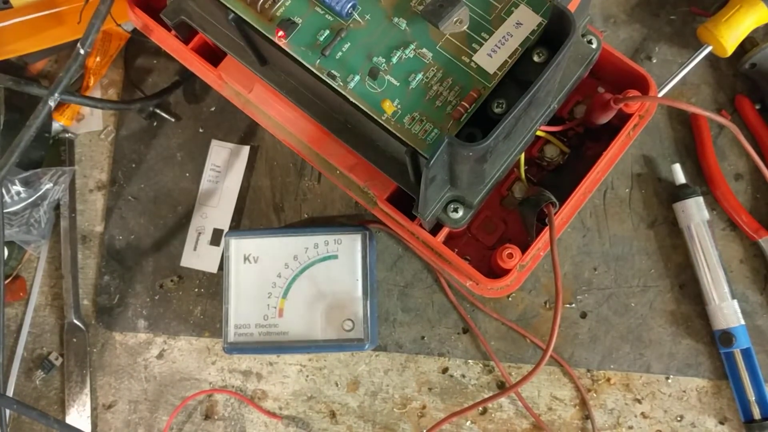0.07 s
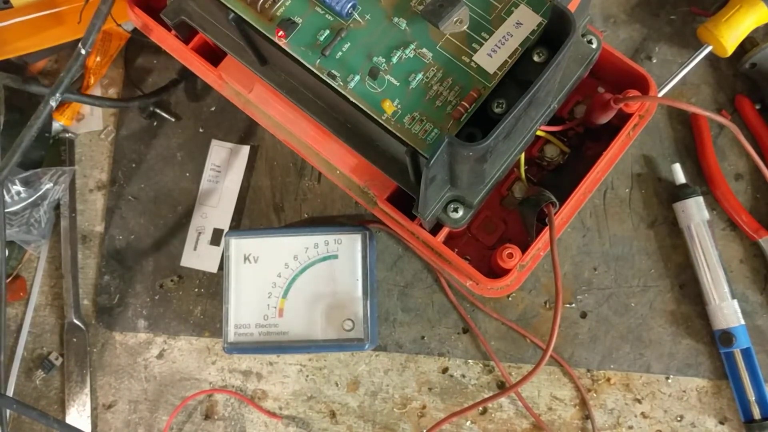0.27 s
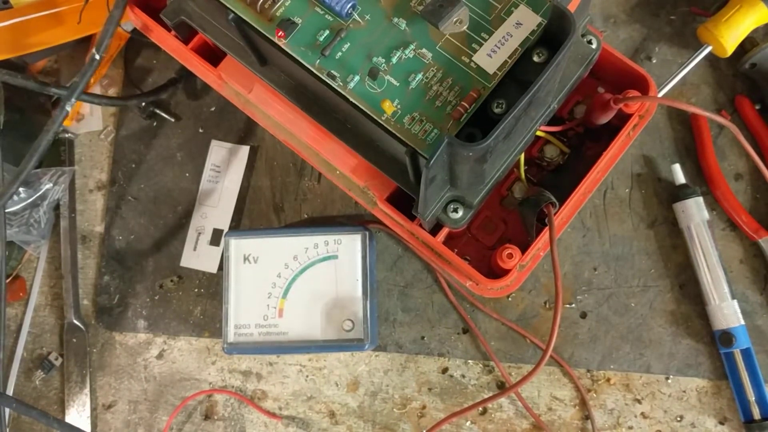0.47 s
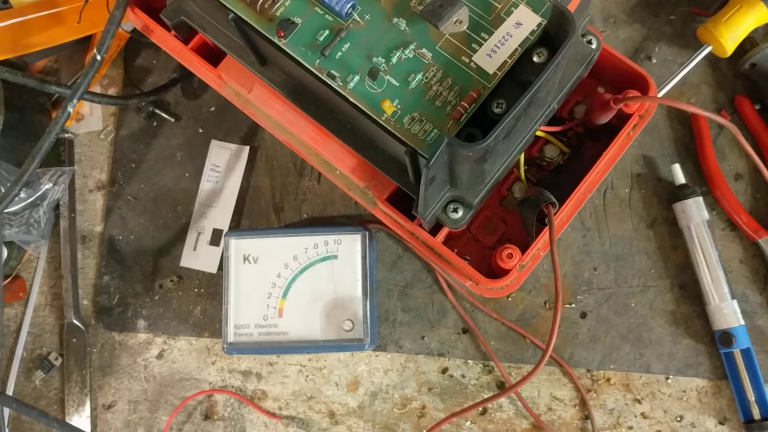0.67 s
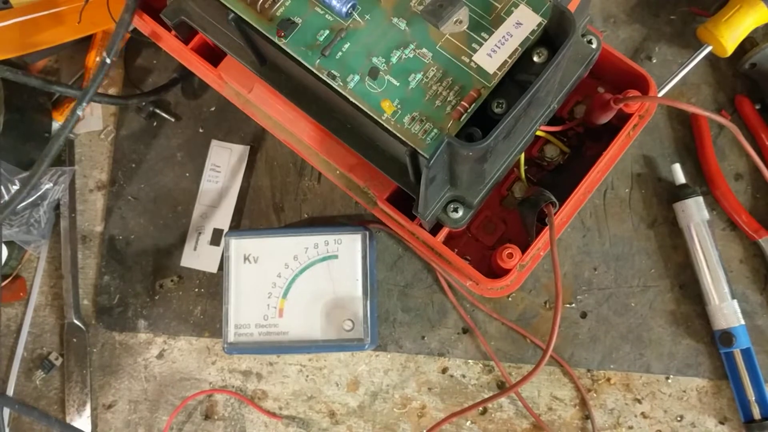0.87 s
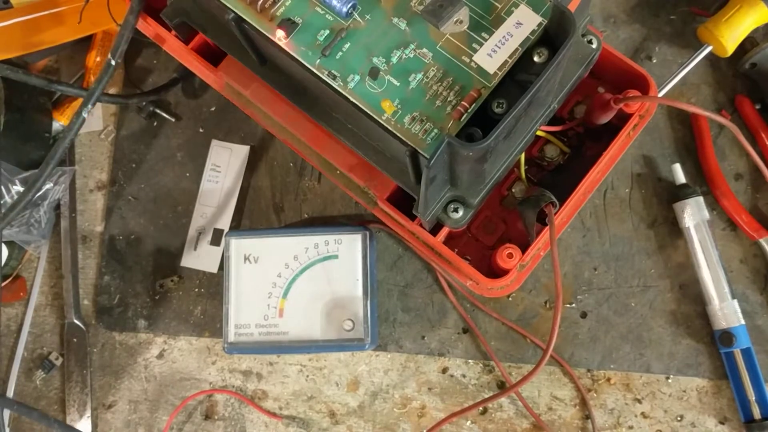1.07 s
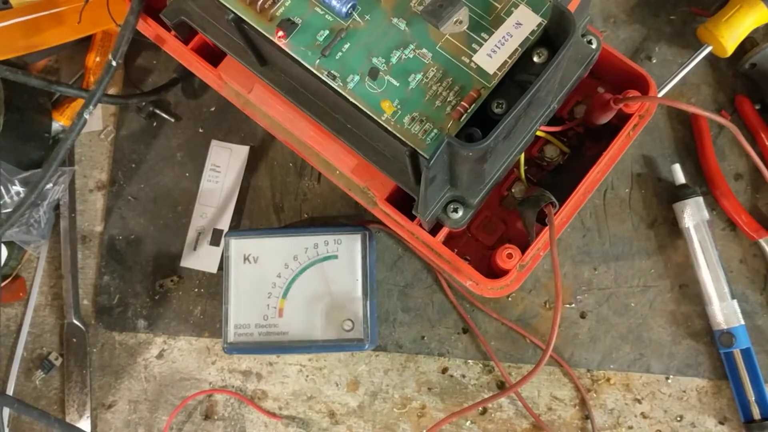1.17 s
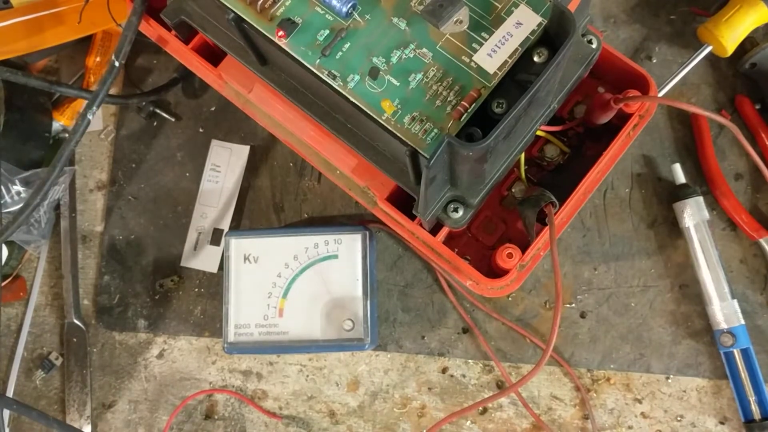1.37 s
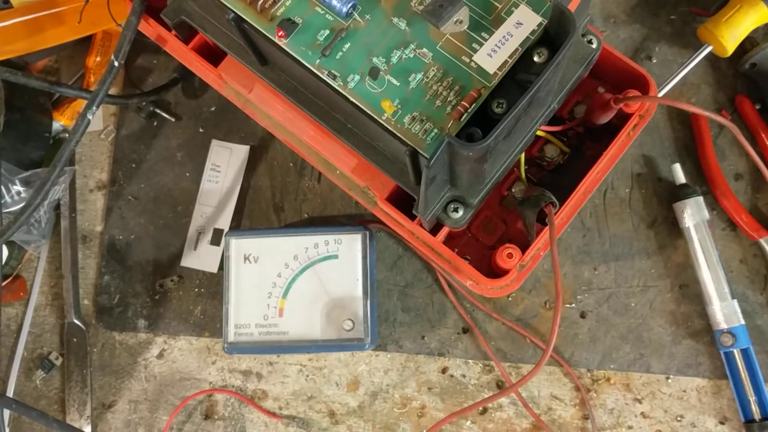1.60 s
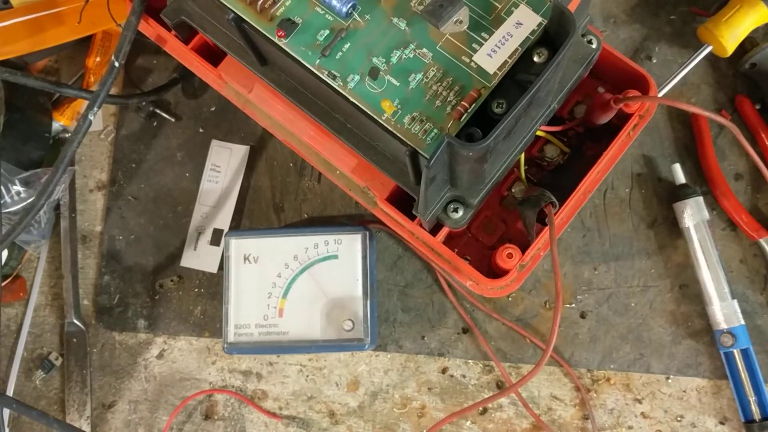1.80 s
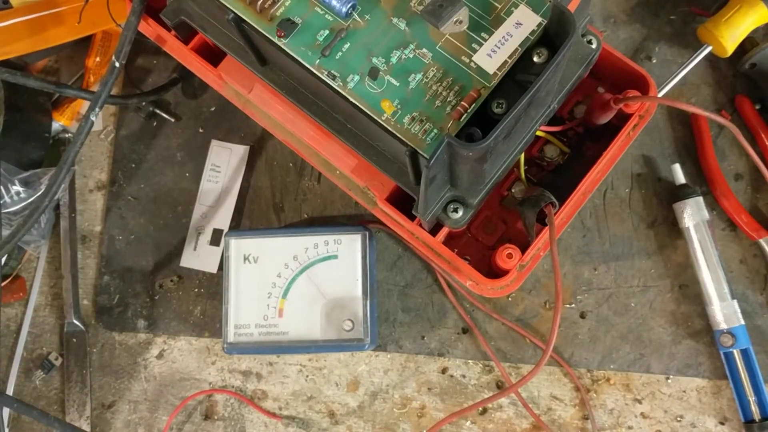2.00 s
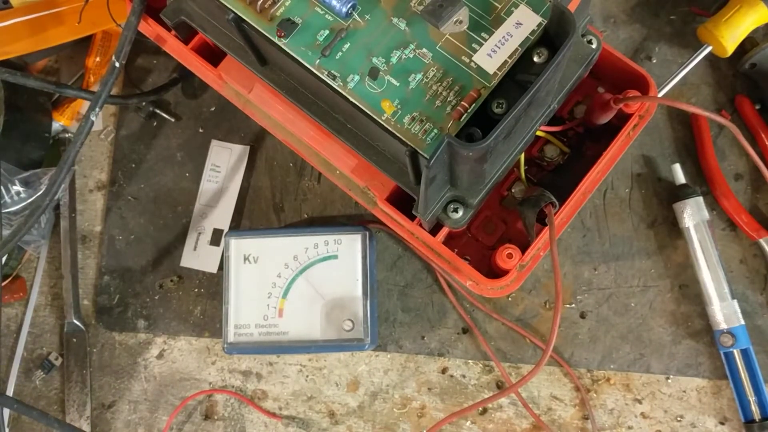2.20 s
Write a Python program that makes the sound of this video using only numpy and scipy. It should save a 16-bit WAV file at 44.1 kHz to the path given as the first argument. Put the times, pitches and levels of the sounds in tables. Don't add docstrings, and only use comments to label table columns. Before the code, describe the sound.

An electric fence charger gives one sharp snap with a brief hollow ring midway, in a small workshop; low handling bumps, creaks and tiny ticks surround it over faint mains hum, captured close by a handheld camera.

```python
import sys
import numpy as np
from scipy import signal
from scipy.fft import rfft, irfft
from scipy.io import wavfile
from scipy.ndimage import uniform_filter1d

SR = 44100
rng = np.random.default_rng(int(sys.argv[2]) if len(sys.argv) > 2 else 0)


def rack_gain(trim_db):
    fader = np.asarray(trim_db, float)
    return 10 ** (fader / 20)


def persist_wave(psi):
    counts = np.round(np.clip(psi, -1, 1) * 32767).astype(np.int16)
    wavfile.write(sys.argv[1], SR, np.atleast_2d(counts).T)


N = 99225


def evened(x):
    return x / np.sqrt(np.mean(x ** 2) + 1e-20)


def read(points, hz):
    f, value = np.transpose(points)
    return np.interp(np.log(hz + 1), np.log(f + 1), value)


def add(mix, s, sound):
    part = mix[round(s * SR):][:len(sound)]
    part += sound[:len(part)]


def coloured(points, size):
    gain = rack_gain(read(points, np.fft.rfftfreq(size, 1 / SR)))
    return evened(irfft(rfft(rng.standard_normal(size)) * gain, size))


def resonate(x, hz, width_hz):
    turn = np.exp(2j * np.pi * np.cumsum(hz * np.ones(len(x))) / SR)
    r = np.exp(-np.pi * width_hz / SR)
    return 2 * (turn * signal.lfilter([1 - r], [1, -r], x / turn)).real


def resonate_twice(x, hz, first_width_hz, second_width_hz):
    return resonate(resonate(x, hz, first_width_hz), hz, second_width_hz)


def wander(s):
    k = max(int(s * SR), 1)
    return evened(uniform_filter1d(uniform_filter1d(rng.standard_normal(N), k), k))


def case_ring(t):
    # f/Hz, level/dB, t60/s
    modes = [(629, -4, 0.042), (1021, 1, 0.03), (1227, -8.5, 0.055), (1463, -3, 0.032), (1785, -13, 0.035),
             (2040, 5, 0.027), (2565, 2, 0.024), (2750, -6, 0.01), (3095, -2, 0.025), (3316, -3.5, 0.04),
             (4140, -10, 0.035), (5030, -9, 0.03), (5374, -8, 0.029), (7570, -16, 0.027)]
    rise_s, slow_hz = 0.0028, 886
    rattle, rattle_s = 0.35, 0.005
    wobble = uniform_filter1d(rng.standard_normal((len(modes), len(t))), int(rattle_s * SR), axis=1)
    loose = 1 + rattle * evened(wobble)
    out = np.zeros(len(t))
    for (hz, db, t60), phase, rough in zip(modes, rng.random(len(modes)), loose):
        rise = np.minimum(t / rise_s / (1 + (slow_hz / hz) ** 2), 1) ** 2
        out += rise * rough * rack_gain(db - 60 * t / t60) * np.sin(2 * np.pi * (hz * t + phase))
    return out


def discharge_crack(t):
    # f/Hz, level/dB
    spectrum = [(300, -62), (550, -16.5), (2600, -3.5), (5250, -20), (5900, -22), (13500, -28.5),
                (15200, -22), (16500, -35)]
    split_hz = 6050
    spark_db, spark_t60_s, spark_rise_s = -23, 0.018, 0.0027
    crack_db, crack_t60_s, crack_rise_s = -31, 0.035, 0.00096
    noise = coloured(spectrum, len(t))
    high = signal.sosfilt(signal.butter(N=4, Wn=split_hz, btype="high", fs=SR, output="sos"), noise)
    low = signal.sosfilt(signal.butter(N=4, Wn=split_hz, fs=SR, output="sos"), noise)
    spark = high * rack_gain(spark_db - 60 * t / spark_t60_s) * np.minimum(t / spark_rise_s, 1)
    crack = low * rack_gain(crack_db - 60 * t / crack_t60_s) * np.minimum(t / crack_rise_s, 1)
    return spark + crack


def room_tail(t):
    # f/Hz, t60/s
    decay = [(450, 0.46), (1500, 0.27), (4000, 0.3), (8000, 0.3), (15000, 0.065)]
    # f/Hz, level/dB
    colour = [(250, -12), (450, -0.5), (1100, 2.5), (2300, 3), (3600, -7), (5500, -14), (8000, -24),
              (15000, -31)]
    level_db, delay_s, rise_s = -51.5, 0.004, 0.0017
    hz, ft, z = signal.stft(rng.standard_normal(len(t)), SR, nperseg=256)
    gain_db = read(colour, hz)[:, None] - 60 * ft / read(decay, hz)[:, None]
    tail = signal.istft(z * rack_gain(gain_db), SR, nperseg=256)[1][:len(t)]
    tail = tail * np.clip((t - delay_s) / rise_s, 0, 1)
    return rack_gain(level_db) * tail / np.std(tail[:SR // 50])


def snap():
    # delay/s, level/dB
    echoes = [
        (.0043, -16.5),
        (.0081, -23),
        (0.0115, -16),
    ]
    snap_s, ring_db = 1.1177, -28.5
    t = np.arange(SR // 2) / SR
    direct = rack_gain(ring_db) * case_ring(t) + discharge_crack(t)
    out = np.zeros(N)
    for delay_s, db in echoes:
        add(out, snap_s + delay_s, rack_gain(db) * uniform_filter1d(direct, size=4))
    add(out, snap_s, direct + room_tail(t))
    return out


def bumps():
    # centre t/s, peak level/dB, f/Hz, length/cycles
    heavy = [(0.212, -27, 84.6, 1), (0.235, -35, 50, 1.14), (0.289, -38, 113, 3), (0.294, -34.5, 55.3, 2.4),
             (0.312, -26.5, 120, 1.14), (0.322, -29.5, 74, 3.3), (0.381, -34.5, 70.3, 2.6),
             (0.442, -34.5, 79, 0.27), (0.463, -33.5, 69, 1.4), (0.489, -39, 120, 2.8),
             (0.531, -47, 70.4, 1.2), (0.55, -30, 69.6, 2.1), (0.573, -29, 112.5, 2.4),
             (0.622, -41, 56.4, 0.48), (0.716, -37.5, 52, 3), (0.831, -37.5, 120, 2.1),
             (0.834, -33.5, 68.4, 2.64), (0.917, -40.5, 56.2, 7.1), (0.933, -25.5, 160, 1.32),
             (0.959, -27, 118, 1.3), (0.983, -37.5, 77, 0.8), (1.0, -33.5, 147, 1.35),
             (1.011, -25.0, 64.6, 1.83), (1.059, -36.5, 111.5, 1.9), (1.155, -36.5, 63.6, 2.55),
             (1.216, -32.5, 83.3, 0.99), (1.674, -38, 148.5, 3.3), (1.672, -34, 80, 3.54),
             (1.715, -45, 59.7, 5.2), (1.963, -34.5, 77.6, 1.22)]
    # centre t/s, peak level/dB, f/Hz, length/cycles
    light = [(0.297, -49.5, 224, 5.9), (0.312, -38, 203, 1.1), (0.336, -49, 220, 1.6),
             (0.347, -38.5, 191, 1.8), (0.451, -43.5, 187, 3.7), (0.475, -44, 186, 3.1),
             (0.501, -43, 214, 2.2), (0.534, -42, 240, 1.1), (0.544, -42.5, 194, 6.3),
             (0.556, -42.5, 262, 0.94), (0.564, -40, 245, 5.7), (0.922, -42, 246, 1.3),
             (0.926, -50, 441, 7.8), (0.93, -26.5, 248, 0.67), (0.94, -71, 194, 2.1),
             (0.957, -39.5, 203, 1.7), (1.006, -39, 196, 2.8), (1.289, -43, 61.3, 1.8),
             (1.479, -38, 106.4, 0.87), (1.666, -47.5, 209, 0.87), (1.677, -52.5, 193, 3.7),
             (1.983, -41.5, 110, 2.5), (2.099, -42.5, 55, 0.72), (1.961, -49, 227, 1.5),
             (1.667, -57.5, 314, 2.1), (1.485, -44.5, 59.6, 1.5), (2.24, -43.5, 65, 1.1),
             (0.584, -52.5, 327, 1.8), (0.985, -52.5, 338, 2.7), (0.701, -47, 105, 2.5)]
    # t/s, level/dB
    pressure = [(0, -42), (0.199, -73), (.3, -44), (.58, -40.5), (0.801, -53.5), (0.928, -38), (1.05, -45),
                (1.25, -55.5), (1.6, -54.5), (1.679, -41), (1.8, -61), (1.92, -60), (1.98, -53.5),
                (2.25, -54.5)]
    # f/Hz, level/dB
    rumble_spectrum = [(20, -57), (40, 3), (62, 6.5), (110, -5), (200, -16.5), (320, -31), (600, -33.5),
                       (1200, -76)]
    lump_db, lump_s = 2.5, 0.012
    rise_share, pitch_sag = 0.62, 0.087
    rumble = evened(coloured(rumble_spectrum, N) * rack_gain(lump_db * wander(lump_s)))
    out = rack_gain(np.interp(np.arange(N) / SR, *np.transpose(pressure))) * rumble
    for s, db, hz, cycles in [*heavy, *light]:
        u = np.arange(-2, 3, hz / cycles / SR)
        shape = np.exp(-2 * np.where(u < 0, u / rise_share, u) ** 2)
        turns = cycles * (u - pitch_sag * u * u) + rng.random()
        add(out, s - 2 * cycles / hz, rack_gain(db) * shape * np.cos(2 * np.pi * turns))
    return out


def creaks():
    # start t/s, length/s, level/dB, centre f/Hz, slip rate/Hz, width/centre
    rubs = [(0.21, 0.23, -86, 6481, 550, 0.56), (0.291, 0.07, -71.5, 2480, 1140, 1),
            (0.296, 0.076, -79.5, 7407, 1100, 0.44), (.328, 0.0099, -65.5, 1490, 660, 0.28),
            (0.483, .013, -63.5, 970, 990, 0.5), (0.489, 0.033, -60, 430, 880, 0.38),
            (.92, 0.017, -65.5, 630, 390, 0.22), (0.673, 0.058, -74, 235.4, 320, 0.38),
            (0.975, 0.049, -63, 310, 205, 0.22), (1.254, 0.15, -76, 3670, 1600, 0.84),
            (1.382, 0.019, -56.5, 437, 1040, 0.27), (1.375, 0.018, -61.5, 805, 1000, 0.068),
            (1.374, 0.024, -64.5, 1100, 1270, 0.11), (1.401, 0.068, -70.5, 1290, 520, 0.93),
            (1.42, 0.18, -82, 6944, 1000, 0.41), (1.679, 0.035, -67.5, 2380, 900, 0.97),
            (1.71, 0.032, -70, 1380, 1000, 0.35), (1.908, 0.0097, -66, 1620, 770, 0.29),
            (1.957, 0.021, -63.5, 244.4, 400, 0.19), (2.235, 0.024, -57.5, 203, 280, 0.43)]
    # start t/s, length/s, level/dB, centre f/Hz, slip rate/Hz, width/centre
    pings = [
        (.291, .005, -70, 3400, 900, .08),
        (.316, .008, -69, 3550, 900, .08),
        (.33, .01, -70, 3400, 900, .07),
        (.315, .006, -66, 2500, 900, .15),
    ]
    size = 6000
    t = np.arange(size) / SR
    out = np.zeros(N)
    for s, length_s, db, hz, rate_hz, share in [*rubs, *pings]:
        chance, strength = rng.random((2, size))
        slips = evened((chance < rate_hz / SR) * (0.3 + strength))
        slips = slips + 0.5 * rng.standard_normal(size)
        swell = np.sqrt(abs(np.sin(np.pi * np.clip(t / length_s, 0, 1) ** 0.5)))
        slips = slips * swell * (t < length_s)
        body = resonate_twice(slips, hz, share * hz, 2 * share * hz)
        add(out, s, rack_gain(db) * body / np.sqrt(np.sum(body ** 2) / (length_s * SR)))
    return out


def ticks():
    # t/s, peak level/dB
    tick_times = [(0.209, -66), (0.2213, -62), (0.235, -68), (0.2474, -60), (0.252, -67), (0.2609, -62),
                  (0.2997, -61), (0.29, -65), (0.3034, -65), (0.3124, -68), (0.3168, -54.5), (0.3235, -67),
                  (0.3314, -58), (0.3695, -66), (0.3726, -58), (0.3824, -64.5), (0.5544, -65),
                  (0.8744, -69), (1.3326, -69), (1.35, -66), (1.362, -58.5), (1.4272, -63.5), (1.437, -63),
                  (1.457, -67), (1.4691, -62.5), (1.4884, -62), (1.493, -64), (1.5007, -58.5),
                  (1.5097, -63), (1.695, -64), (1.8064, -64), (2.0577, -62)]
    # f/Hz, width/Hz, level/dB
    resonances = [(2500, 900, -9), (3500, 1200, -7), (5900, 2800, 0), (8700, 2200, -2), (13500, 4500, -16)]
    t60_s, tint_db, size = 0.004, 1.8, 300
    i = np.arange(size)
    fade = rack_gain(-60 * i / SR / t60_s) * np.minimum(i / 15, 1)
    out = np.zeros(N)
    for s, db in tick_times:
        scrape = rng.standard_normal(size) * fade
        tick = np.zeros(size)
        for hz, width_hz, gain_db in resonances:
            gain = rack_gain(gain_db + tint_db * rng.standard_normal())
            tick += gain * resonate_twice(scrape, hz, width_hz, width_hz)
        add(out, s, rack_gain(db + 2.5) * tick / abs(tick).max())
    return out


def hum():
    # f/Hz, rms level/dB, waver width/Hz, share of the charge sag
    lines = [
        (120, -54.5, 4.37, 0),
        (239.3, -73, 26, 0),
        (8160, -92, 80, 0.99),
        (11700, -96.5, 60, 0),
    ]
    # t/s, shift/Hz
    sag = [
        (0, 0),
        (1.34, 0),
        (1.36, -270),
        (1.8, -200),
        (2.25, -70),
    ]
    ring_hz, ring_db, ring_t60_s = 1408, -64, 0.7
    t = np.arange(N) / SR
    out = rack_gain(ring_db - 60 * t / ring_t60_s) * np.sin(2 * np.pi * ring_hz * t)
    for start_hz, db, width_hz, share in lines:
        hz = start_hz + share * np.interp(t, *np.transpose(sag))
        fuzz = evened(resonate_twice(rng.standard_normal(N), hz, width_hz, width_hz))
        tone = np.sin(2 * np.pi * np.cumsum(hz) / SR)
        out = out + rack_gain(db) * evened(tone + 0.51 * fuzz)
    return out


def air():
    # f/Hz, level/dB
    spectrum = [(100, -3), (300, 0), (700, 1), (1800, -5), (4500, -13), (6500, -19.5), (10000, -25.5),
                (16000, -30)]
    level_db, patch_db = -66.5, 1.5
    hz, ft, z = signal.stft(coloured(spectrum, N), SR, nperseg=1024, noverlap=768)
    patches = uniform_filter1d(rng.standard_normal(z.shape), 10, 0)
    patches = evened(uniform_filter1d(patches, 12, 1))
    patchy = signal.istft(z * rack_gain(patch_db * patches), SR, nperseg=1024, noverlap=768)[1][:N]
    return rack_gain(level_db) * evened(patchy)


def scene():
    return (snap() + bumps() + creaks() + ticks() + hum() + air())[None]


def roll_off(x):
    return signal.sosfilt(signal.butter(12, 16490, fs=SR, output="sos"), x)


def record(dry):
    low_cut_hz, edge_hz = 35.8, 15950
    cut = signal.sosfilt(signal.butter(N=3, Wn=low_cut_hz, btype="high", fs=SR, output="sos"), dry)
    limited = signal.oaconvolve(cut, signal.firwin(numtaps=61, cutoff=edge_hz, fs=SR)[None], "same")
    return roll_off(limited)


dry = scene()
out = record(dry)
persist_wave(out)
```